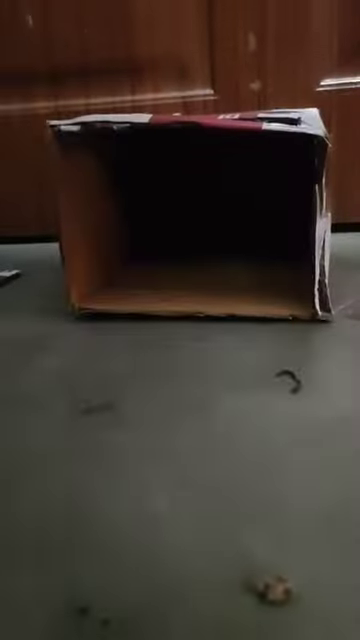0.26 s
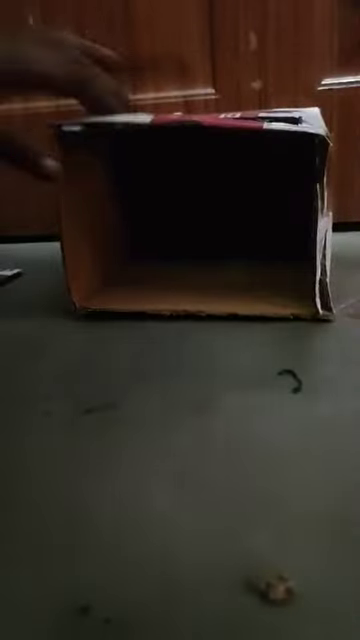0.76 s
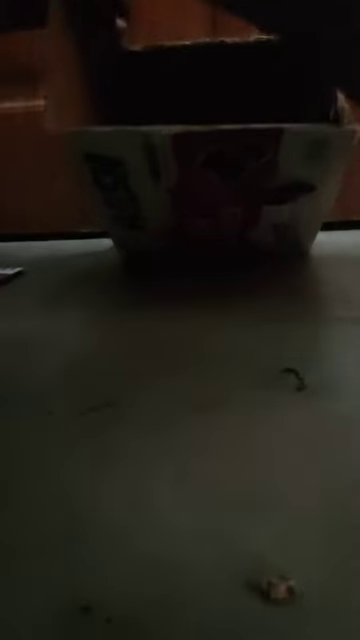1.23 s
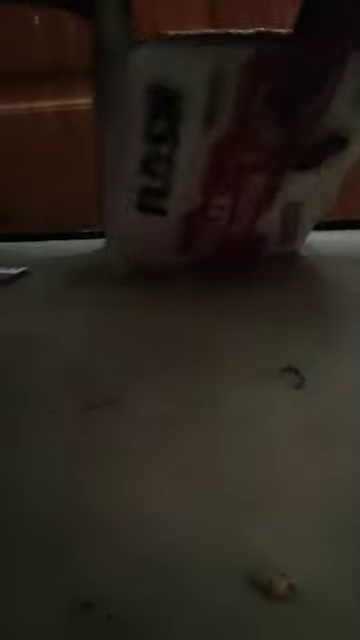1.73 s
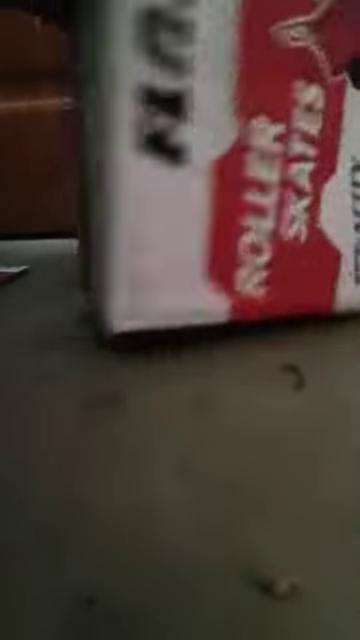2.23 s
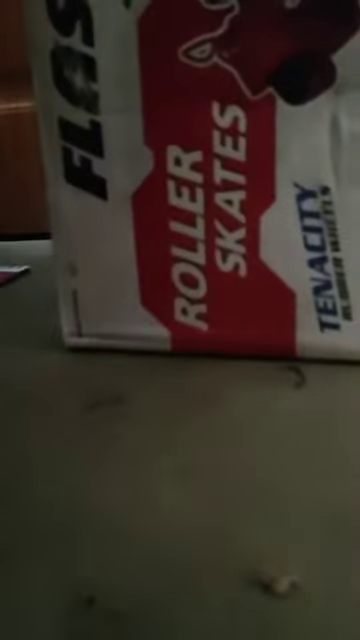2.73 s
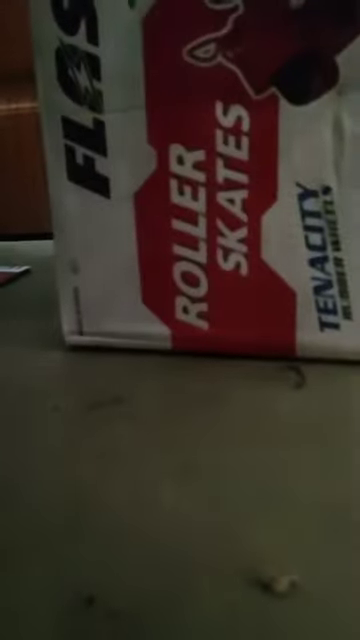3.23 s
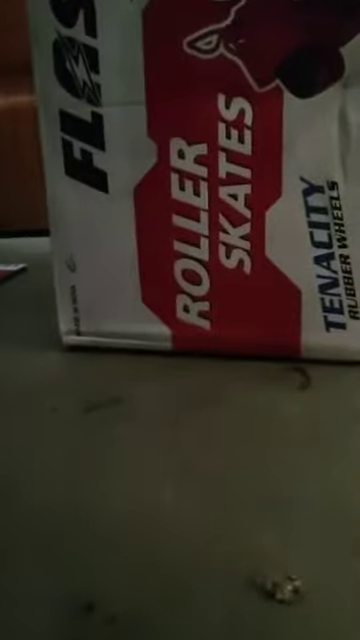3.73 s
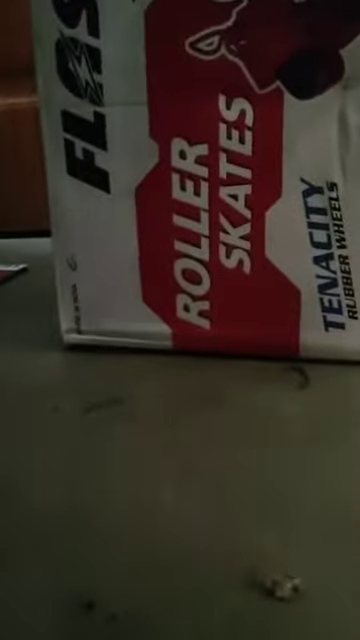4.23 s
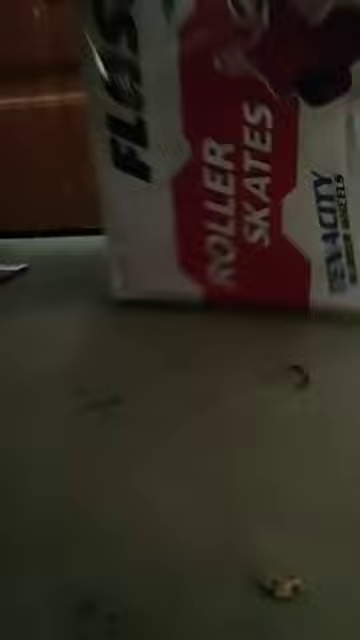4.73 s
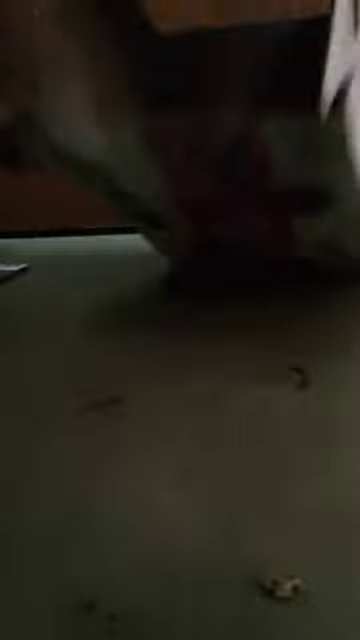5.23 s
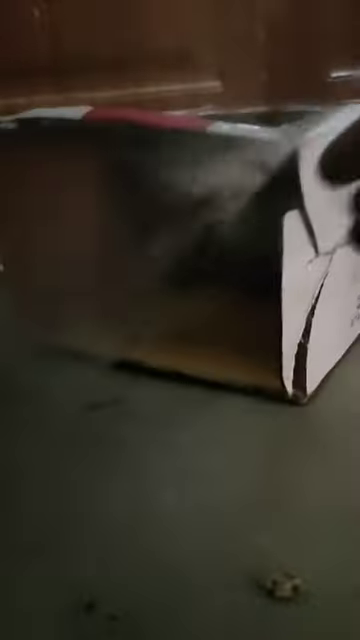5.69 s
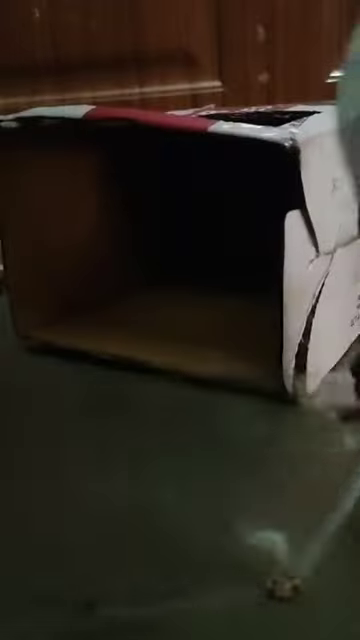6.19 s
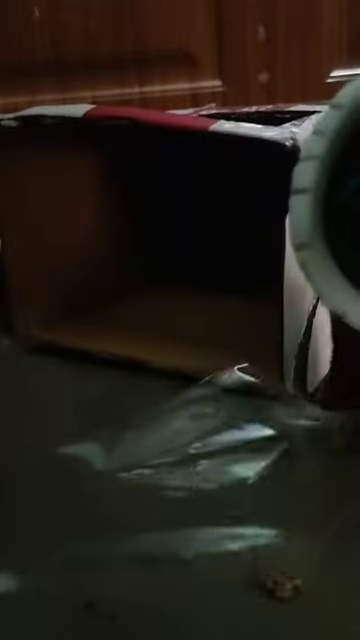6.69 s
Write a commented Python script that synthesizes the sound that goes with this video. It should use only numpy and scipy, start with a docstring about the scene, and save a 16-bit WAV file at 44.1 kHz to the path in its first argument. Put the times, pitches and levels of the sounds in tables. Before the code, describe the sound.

Bangles clink on a wrist as hands turn a hollow cardboard box and a thin plastic sheet crackles and snaps in a small hard room.

```python
"""A thin plastic sheet snaps, crinkles, hisses and squeaks as hands fit it into a cardboard box on a stone floor.
Each snap is a short burst of noise with a ringing facet; crinkles, hiss and squeaks are built from random clicks.
The box booms under the fingers (clicks through narrow resonances) and thuds when struck (fading sine waves).
Bangles clink on the wrist: noisy contacts and high ringing tones.
Around them is a small, hard room with soft air noise and a faint hum, heard from close by."""
import sys
import numpy as np
from scipy import signal
from scipy.fft import rfft, irfft
from scipy.io import wavfile

SR = 44100
rng = np.random.default_rng(int(sys.argv[2]) if len(sys.argv) > 2 else 0)


def unload_wav(signal):
    """Save mono or channel-first audio to the path in sys.argv[1] as 16-bit WAV at rate SR, clipped to [-1, 1]."""
    wavfile.write(
        sys.argv[1],
        SR,
        np.round(np.clip(np.atleast_2d(signal).T, -1, 1) * 32767).astype(np.int16),
    )


N = 306495
T = np.arange(N) / SR  # time of every sample, in seconds


def undb(db):
    """Turn decibels into a plain multiplier."""
    return 10 ** (np.asarray(db) / 20)


def unit(x):
    """Scale a sound to an average (rms) strength of 1."""
    return x / np.sqrt(np.mean(x ** 2))


def fade(t, t60):
    """A sound left to die away, 60 dB weaker after t60 seconds."""
    return np.exp(-np.log(1000) * t / t60)


def freqs(x):
    """Frequency in Hz of each bin of the spectrum of x, kept at 1 or more."""
    return np.maximum(np.fft.rfftfreq(x.shape[-1], 1 / SR), 1)


def colour(x, points):
    """Shape a sound by a spectrum of (pitch_hz, level_db) points, then scale it to strength 1."""
    hz, db = np.transpose(points)
    gain = undb(np.interp(np.log(freqs(x)), np.log(hz), db))
    return unit(irfft(rfft(x) * gain, x.shape[-1]))


def resonate(x, hz, width_hz):
    """One resonance: passes its centre pitch unchanged and weakens the pitches around it."""
    f = freqs(x)
    return irfft(rfft(x) / (1 + 1j * (f / hz - hz / f) * hz / width_hz), len(x))


def add(track, s, sound):
    """Mix a sound into a track, starting at s seconds."""
    i = int(s * SR)
    track[..., i:i + sound.shape[-1]] += sound[..., :N - i]


def grains(rate, spread_db, size=N):
    """Random clicks, about rate per second, most small and a few large."""
    sizes = undb(spread_db * np.minimum(rng.exponential(size=size), 4))
    happens = rng.random(size) < rate / SR
    return happens * sizes * rng.choice([-1, 1], size)


def walk(rate, size=N):
    """Smooth random wander of spread near 1, given a new target rate times a second."""
    k = int(SR / rate)
    targets = rng.standard_normal(size // k + 2)
    return 1.2 * np.interp(np.arange(size) / k, np.arange(size // k + 2), targets)


def pair(size):
    """Spread-out noise at two nearby microphone openings: alike in the bass, unrelated in the treble."""
    mid, side = rng.standard_normal((2, size))
    alike = np.sinc(freqs(mid) / 1400)
    mid = irfft(rfft(mid) * np.sqrt(1 + alike), size)
    side = irfft(rfft(side) * np.sqrt(1 - alike), size)
    return np.array([mid + side, mid - side]) / np.sqrt(2)


# spectrum of the still air in the room: pitch_hz, level_db
AIR_SPECTRUM = [(15, -62), (25, -15), (43, -35), (114, -4), (145, -7.5), (175, 0), (206, -6), (344, -5.5),
                (373, -9.5), (451, -9), (489, -9), (714, -19.5), (911, -21), (1400, -21.5), (16000, -35.5)]
# tones of the hum: pitch_hz, level_db
HUM_TONES = [(57, -73), (172.3, -67), (247.6, -67.5), (446.8, -74.5), (699.8, -84.5)]
AIR_LEVEL_DB, HUM_WIDTH_HZ = -59.5, 4


def room_tone():
    """Soft air noise, and a hum of narrow bands of noise that waver slightly."""
    hum = 0
    for hz, level_db in HUM_TONES:
        tone = resonate(resonate(rng.standard_normal(N), hz, HUM_WIDTH_HZ), hz, 30)
        hum = hum + undb(level_db) * unit(tone)
    return undb(AIR_LEVEL_DB) * colour(pair(N), AIR_SPECTRUM) + hum


# where the hands are: time_s, left_lead_s (how much sooner the left side hears a source with offside 1)
HAND_PATH = [(.6, .00039), (1.2, .0001), (1.75, -.0002), (2.5, .00045), (4.9, .0004), (5.85, .00045),
             (6.3, -.00009), (6.7, .00014)]
SHADE_DB = 0.5  # shift of the balance to the left when the hands are furthest left and offside is 1


def place(x, offside, pan_db, early_db, late_db):
    """One side hears a sound slightly sooner; each has its own balance; floor and door reflect, the room rings."""
    bearing, t = np.interp(T, *np.transpose(HAND_PATH)), T[:SR * 3 // 4]
    # left-right balance: above 0 the left is louder, below 0 the right
    balance_db = pan_db + SHADE_DB * offside * bearing / bearing.max()
    x = x * undb(np.array([[1], [-1]]) * balance_db / 2)
    # the echoes are fading noise: a short dense part, then a longer tail
    early = pair(len(t)) * fade(t, 0.15) * (t > .0015)
    tail = colour(pair(len(t)), [(100, 6.5), (2500, 4.0), (7000, 2), (16000, -6)])  # pitch_hz, level_db
    late = tail * fade(t, 0.57) * (t > .012)
    echo = (undb(early_db) * unit(early) + undb(late_db) * unit(late)) / np.sqrt(len(t))
    lead = np.round(offside * bearing * SR) / SR  # whole samples
    direct = np.array([x[0], np.interp(T - lead, T, x[1])])
    return direct + signal.fftconvolve(x, echo, axes=1)[:, :N]


# bangles striking each other: start_s, level_db, chatter_s (time constant of its dying out), ring_db (free ringing)
BANGLE_CLINKS = [(0.362, -45, .018, -18), (0.375, -32, 0.0094, -21), (0.519, -36.5, 0.011, -16),
                 (0.5472, -22.5, .008, -19), (2.902, -40.5, 0.013, -10), (2.9253, -40.5, 0.0072, -5),
                 (2.967, -41, 0.012, -15), (3.026, -34, .018, -14), (3.0775, -33, .018, -14),
                 (3.1103, -23.5, 0.013, -18), (3.122, -27, 0.0087, -2), (3.22, -45.5, .02, -9),
                 (3.2783, -38.5, 0.026, -36), (3.293, -44, .015, -8), (3.3228, -34.5, 0.0043, -22),
                 (3.355, -46.5, 0.016, -0.5), (3.4275, -26.5, 0.0044, -16), (3.4441, -27.5, 0.03, -9),
                 (3.464, -37, 0.02, -5), (3.4915, -28, .018, -14), (3.516, -35.5, 0.015, -5),
                 (3.5362, -30, 0.0044, -36), (3.592, -38, .004, -20), (3.7002, -35.5, 0.005, -23),
                 (3.7213, -43.5, 0.0074, -8)]
# typical ringing tones of the bangles: pitch_hz, level_db, fade_s (time to fall by 60 dB)
BANGLE_TONES = [(3150, -25, 0.089), (4410, -9.5, 0.11), (4580, -4.5, 0.12), (6280, 7, .12),
                (7950, -23, 0.054), (9070, 15, 0.068), (9500, 7, 0.085), (10100, -5, 0.059),
                (11450, -20, 0.056), (12900, 5, .08), (13000, -14, .1), (14060, -3, .18), (14600, -9, 0.1),
                (15560, -5, 0.063)]
# spectrum of the hard contact: pitch_hz, level_db
CONTACT_SPECTRUM = [(1000, -62), (2300, -13.5), (4800, -2.5), (7500, -3), (10000, 0.5), (12000, -3.5),
                    (15000, 8), (16500, -1)]
CONTACT_T60_S, CHATTER_PER_S, CHATTER_DB = 0.019, 280, -11


def bangles():
    """Each clink is a hard contact and a chatter of more; bangles that swing clear of the wrist ring on."""
    out, t = np.zeros(N), T[:SR // 4]
    hz, db, t60 = np.transpose(BANGLE_TONES)
    decays = np.array([fade(t, d) for d in t60])
    for s, level_db, chatter_s, ring_db in BANGLE_CLINKS:
        # every clink has its own slight tuning and balance of tones
        detune, strength, phase = rng.standard_normal((3, len(hz), 1))
        tuning = hz[:, None] * (1 + .007 * detune)
        weight = undb(db[:, None] + 3 * strength)
        tones = weight * np.sin(2 * np.pi * (tuning * t + phase)) * decays
        ring = tones.sum(0) / np.linalg.norm(weight)
        contact = colour(rng.standard_normal(len(t)), CONTACT_SPECTRUM) * fade(t, CONTACT_T60_S)
        strike = contact + undb(ring_db) * ring
        hits = undb(CHATTER_DB) * grains(CHATTER_PER_S, 2.5, size=len(t)) * np.exp(-t / chatter_s)
        hits[0] = 1  # the first, full contact
        add(out, s, undb(level_db) * signal.fftconvolve(strike, hits)[:len(t)])
    return out


# each shift of the hands on box and sheet:
# start_s, length_s, boom_db (hollow note), rumble_db (walls), crinkle_db (sheet), drumming_db (panel)
GRIP_SHIFTS = [(0.867, 0.16, -55, -64.5, -67, -58), (1.102, 0.31, -42, -54, -54, -48.5),
               (1.48, 0.11, -53, -59.5, -59, -58), (1.634, 0.43, -50, -55.5, -52.5, -56.5),
               (2.188, 0.12, -55, -60, -63, -63), (2.427, 0.34, -47.5, -56.5, -57.5, -61),
               (2.784, 0.47, -46.5, -59, -70, -59), (3.45, 0.35, -54, -69, -66.5, -57.5),
               (3.81, 0.24, -49.5, -61.5, -60, -61), (4.135, 0.023, -59, -62.5, -57.5, -62),
               (4.47, 0.32, -63, -58.5, -55, -53), (4.83, 0.26, -67, -54.5, -51, -55),
               (5.194, 0.3, -61, -54.5, -47.5, -59.5), (5.679, .13, -52, -46, -44.5, -52),
               (5.902, 0.25, -71, -58.5, -60.5, -71), (6.341, .11, -78, -72, -52, -77)]
HOLD_FROM_S = 1  # from here to the end the fingers also keep a faint steady hold
GRIP_SWELL, GRIP_RELEASE_S = 0.31, 0.21  # share of its length over which a shift swells; time to fall by 60 dB


def handling(hold_db, column):
    """Level of one handling sound: each shift of grip swells, holds and dies away, over the steady hold."""
    t = T[::32]  # a coarse time grid is enough
    power = undb(hold_db) ** 2 * (t > HOLD_FROM_S)
    for row in GRIP_SHIFTS:
        s, length_s = row[:2]
        swell = np.clip((t - s) / (GRIP_SWELL * length_s), 0, 1)
        envelope = swell * fade(np.maximum(t - s - length_s, 0), GRIP_RELEASE_S)
        power = power + (undb(row[column]) * envelope) ** 2
    return np.interp(T, t, np.sqrt(power))


# spectrum of the box walls: pitch_hz, level_db
WALL_SPECTRUM = [(24, -64), (40, -21), (197, 1), (243, -29), (291, -4), (334, -7), (466, -9.5), (513, 1),
                 (716, -28), (857, -5.5), (1100, -59), (1430, -57), (2420, -120)]
CAVITY_HZ, CAVITY_WIDTH_HZ, CAVITY_WAVER_HZ = 246, 8, 1.1  # the air inside the box
PANEL_HZ, PANEL_WIDTH_HZ = 207.6, 66
HOLD_BOOM_DB, HOLD_RUMBLE_DB = -62, -76  # steady hold: hollow note; walls and panel


def box_rub():
    """Fingers stick and slip: a panel drums, walls rumble, the air inside hums a note that wavers as the box flexes."""
    note = resonate(resonate(grains(900, 3), CAVITY_HZ, CAVITY_WIDTH_HZ), CAVITY_HZ, 90)
    note = signal.hilbert(note)  # complex form, so its pitch can be shifted
    pitch_waver = np.exp(2j * np.pi * np.cumsum(CAVITY_WAVER_HZ * walk(14)) / SR)
    flex = pitch_waver * undb(1.6 * walk(18))
    # evened out: steady rubbing keeps the note from dying away between slips
    boom = unit((flex * note / np.abs(note) ** .6).real)
    panel = unit(resonate(resonate(grains(400, 3), PANEL_HZ, PANEL_WIDTH_HZ), PANEL_HZ, 90))
    walls = colour(grains(900, 4.6), WALL_SPECTRUM)
    out = boom * handling(HOLD_BOOM_DB, column=2)
    out = out + walls * handling(HOLD_RUMBLE_DB, column=3)
    return out + panel * handling(HOLD_RUMBLE_DB, column=5)


# blows on the box: start_s, level_db, spot_hz (pitch favoured by the spot struck), spread_octaves (around it)
BOX_BLOWS = [(1.07, -28, 216, 0.47), (1.088, -29.5, 195, 0.54), (1.162, -24, 220, 0.51),
             (1.225, -37, 205, 0.59), (1.512, -39, 350, 1.5), (1.85, -32.5, 209, 0.39),
             (1.955, -35.5, 214, 0.51), (2.442, -34, 332, 1.9), (2.475, -35.5, 510, .7),
             (2.508, -27.5, 510, 0.76), (2.636, -45, 332, .6), (2.698, -46, 440, 0.71),
             (2.714, -35.5, 505, 0.36), (3.1, -29.5, 254, 1.03), (3.753, -41, 182, 0.41),
             (4.16, -42.5, 300, 1.6), (4.555, -31, 397, 1.1), (4.574, -40, 500, 0.61),
             (4.682, -33.5, 330, 1.66), (4.733, -31.5, 480, 0.96), (4.756, -38.5, 350, 1.7),
             (5.517, -35, 300, 1.6), (5.653, -10.5, 458, 1.09), (5.675, -20, 220, 1.6),
             (5.697, -18, 280, 0.99), (5.772, -28, 193, 0.78), (5.787, -30, 496, 0.69)]
# typical ringing tones of the box: pitch_hz, level_db, fade_s (time to fall by 60 dB)
BOX_TONES = [(96.8, -2.5, 0.58), (121.7, 2, 0.23), (148.4, -4, 0.13), (181.4, -1.5, 0.16), (209.1, 0, 0.13),
             (231, -3, .12), (264.4, -1, 0.099), (325.2, -1, 0.18), (399, -3.5, 0.11), (449.3, -8, 0.117),
             (476.5, 2, 0.069), (516, 7, 0.067), (819, 0.5, 0.058), (1420, 16, 0.11)]
MODE_SHIFT, FLUTTER_DB = .012, -17  # share by which the grip retunes each tone; level of the loose flaps


def box_knocks():
    """Blows ring the box: slack panels favour low tones, stiff edges high ones; loose flaps flutter dully."""
    out, t = np.zeros(N), T[:SR // 2]
    hz, db, t60 = np.transpose(BOX_TONES)
    for s, level_db, spot_hz, octaves in BOX_BLOWS:
        weight = undb(db) * np.exp(-(np.log2(hz / spot_hz) / octaves) ** 2)
        tuning = hz * (1 + MODE_SHIFT * rng.standard_normal(len(hz)))
        ring = np.zeros(len(t))
        for f, w, d in zip(tuning, weight, t60):
            ring += w * np.sin(2 * np.pi * (f * t + rng.random())) * fade(t, d)
        ring = ring / np.linalg.norm(weight)
        flutter = undb(FLUTTER_DB) * colour(rng.standard_normal(len(t)), WALL_SPECTRUM) * fade(t, 0.22)
        push = (1 - np.exp(-t / .0013)) ** 2  # soft start of the blow
        add(out, s, undb(level_db) * (ring + flutter) * push)
    return out


# spectrum of the crinkling: pitch_hz, level_db
CRINKLE_SPECTRUM = [(400, 14), (800, 12), (1400, 15.5), (2600, 9), (4500, 4), (8000, 0.5), (16000, -3)]
HOLD_CRINKLE_DB = -67.5  # crinkling under the steady hold
FACET_WIDTH_HZ = 550  # a facet is a flat patch of sheet between creases; also used by the snaps


def crinkle():
    """Many tiny creases give way in flurries, each facet with its own brief rattle and pitch."""
    t, facets = T[:SR // 50], 0
    flurry = undb(4 * walk(35))  # crowds and thins the clicks
    for hz in np.geomspace(1200, 6000, 10):
        rattle = rng.standard_normal(len(t)) * fade(t, 0.0071)
        rattle = unit(rattle + 2 * resonate(rattle, hz, FACET_WIDTH_HZ))
        facets = facets + signal.oaconvolve(grains(55 * flurry, 6), rattle)[:N]
    return colour(facets, CRINKLE_SPECTRUM) * handling(HOLD_CRINKLE_DB, column=4)


# the sheet dragged over cardboard: start_s, length_s, rasp_db, hiss_db, pitch_hz (of the rasp)
SHEET_STROKES = [(1.044, 0.056, -51, -53, 1570), (1.134, 0.21, -53, -48, 2530),
                 (1.765, 0.21, -46.5, -47.5, 1500), (1.897, 0.12, -50, -52, 2790),
                 (2.05, 0.1, -52.5, -55.5, 2550), (2.437, 0.082, -41, -48, 1690),
                 (3.003, 0.06, -41.5, -47.5, 3680), (3.085, 0.08, -40, -45, 3520),
                 (4.933, 0.1, -49.5, -43.5, 4180), (5.269, 0.23, -51, -45.5, 2450),
                 (5.644, 0.074, -36, -47, 2350), (5.758, 0.089, -51, -45, 2460),
                 (5.914, 0.083, -45.5, -65, 1620), (6.097, 0.082, -48.5, -56.5, 2400),
                 (6.289, 0.11, -56, -47.5, 4060)]
# spectrum of the coarse slips: pitch_hz, level_db
RASP_SPECTRUM = [(300, 7), (800, 8), (1100, 7), (1500, 6), (2700, 4.5), (4500, 4), (7000, -54),
                 (16000, -27)]
# spectrum of the fine slips: pitch_hz, level_db
HISS_SPECTRUM = [(2000, -38), (4000, -9), (7000, 6), (10000, 1.5), (13000, 1), (16000, 3)]
STROKE_ARCH, JERK_DB, JERKS_PER_S = .7, 2.5, 70  # below 1 the stroke's arch is fuller; size and pace of its jerks


def slide():
    """Film dragged in small jerks: coarse slips rasp in the wall, fine ones merge into a hiss."""
    out, size = np.zeros(N), SR // 2
    for s, length_s, rasp_db, hiss_db, hz in SHEET_STROKES:
        slips = colour(grains(2000, 4.5, size=size), RASP_SPECTRUM)
        rasp = unit(slips + 2.3 * resonate(slips, hz, 700))
        hiss = colour(grains(7000, 5, size=size), HISS_SPECTRUM)
        speed = np.sin(np.pi * np.clip(T[:size] / length_s, 0, 1)) ** STROKE_ARCH
        jerks = undb(JERK_DB * walk(JERKS_PER_S, size=size))
        # the hiss follows the jerks half as strongly in dB
        friction = undb(rasp_db) * rasp * jerks + undb(hiss_db) * hiss * np.sqrt(jerks)
        add(out, s, speed * friction)
    return out


# the sheet catching and squeaking on the cardboard: start_s, length_s, pitch_hz, level_db
SHEET_SQUEAKS = [(1.927, 0.031, 3060, -45), (2.035, 0.018, 1330, -47), (3.658, 0.068, 996, -59)]
SQUEAK_WIDTH = 0.065  # width of the resonance, as a share of its pitch


def squeaks():
    """Where the film grips, its slips fall into step and sing briefly at one rough pitch."""
    out, size = np.zeros(N), SR // 4
    for s, length_s, hz, level_db in SHEET_SQUEAKS:
        width_hz = SQUEAK_WIDTH * hz
        note = resonate(resonate(grains(2900, 0.75, size=size), hz, width_hz), hz, 3 * width_hz)
        arch = np.sin(np.pi * np.clip(T[:size] / length_s, 0, 1))
        add(out, s, undb(level_db) * unit(note) * arch)
    return out


# larger creases snapping over: start_s, level_db, treble_db (-16.5 keeps the spectrum below as it is),
# fade_s (time to fall by 60 dB), facet_hz (pitch of the patch beside the crease)
CREASE_SNAPS = [(1.151, -34, -13, 0.0086, 1440), (1.234, -35, -14, 0.011, 2600),
                (1.3982, -39, -16, 0.015, 2800), (1.5106, -32.5, -16, 0.024, 1190),
                (1.558, -34.5, -15, 0.014, 4670), (1.6173, -42, -19, .0086, 1270),
                (1.649, -40, -22, 0.016, 4400), (1.764, -27.5, -17.5, 0.0094, 2560),
                (1.8121, -30.5, -23, 0.015, 2730), (1.867, -36, -37, .014, 1420),
                (2.076, -30.5, -14.5, 0.017, 4530), (2.353, -48.5, -20, .012, 1370),
                (2.445, -36.5, -18, 0.013, 1480), (2.579, -44, -24, 0.0093, 1500),
                (2.641, -47, -22, .012, 1270), (2.69, -44.5, -39, 0.024, 1420),
                (2.763, -34, -31, 0.0046, 1500), (3.037, -27, -23, 0.017, 3870),
                (3.0777, -32, -21, 0.038, 2730), (3.102, -25.5, -19, 0.013, 2800),
                (3.1105, -20, -24, 0.0064, 4200), (3.123, -40, -28, 0.012, 4900),
                (3.5916, -40.5, -27, 0.01, 3900), (3.6215, -46, -37, 0.012, 2520),
                (3.766, -34.5, -25, 0.0052, 3080), (3.785, -44, -21, .012, 3960),
                (3.928, -36, -27, 0.017, 1370), (4.0336, -41, -20, .0095, 1120),
                (4.135, -49.5, -29, .02, 1590), (4.1775, -38.5, -23.5, 0.0072, 2630),
                (4.336, -41, -19, 0.0099, 4360), (4.3618, -46, -41, 0.0091, 2260),
                (4.3764, -40, -31, 0.0069, 2500), (4.644, -45.5, -8, 0.041, 2220),
                (4.681, -34, -13.5, 0.0098, 2150), (4.7742, -44.5, -47, 0.0097, 2600),
                (4.8393, -38, -26, 0.0061, 1820), (4.863, -43, -42, 0.034, 1510),
                (4.8783, -38.5, -41, 0.02, 2080), (4.927, -22, -18.5, 0.01, 4690),
                (5.0516, -43, -36, 0.01, 2750), (5.075, -39, -38, 0.012, 1390),
                (5.119, -44.5, -23, 0.012, 3190), (5.1589, -32.5, -20, 0.0077, 3800),
                (5.269, -46, -29, .012, 1590), (5.3154, -37.5, -30, 0.0064, 2560),
                (5.341, -39.5, -35, 0.016, 1710), (5.4996, -31, -22, .009, 1590),
                (5.52, -36.5, -24, 0.0069, 2390), (5.625, -40.5, -19, 0.015, 1350),
                (5.6513, -22.5, -21.5, .014, 2540), (5.6717, -25.5, -32, 0.015, 2630),
                (5.7057, -22, -35, 0.0077, 2370), (5.748, -29.5, -45, 0.013, 1540),
                (5.7646, -31, -45, 0.017, 2170), (5.96, -38, -39, 0.0097, 2300),
                (5.9775, -28, -23, 0.0038, 1360), (6.01, -31.5, -53, 0.007, 1490),
                (6.1385, -35.5, -13, 0.019, 1360), (6.29, -35, -8, 0.0077, 1440),
                (6.3852, -23, -2.5, 0.0036, 3760), (6.425, -32.5, -13.5, 0.044, 4700),
                (6.4877, -47, -20, 0.0062, 6460), (6.5594, -31, -14, .013, 1490),
                (6.574, -39.5, -27, 0.031, 1420), (6.766, -38.5, -25, 0.015, 1610),
                (6.783, -47, -33, 0.013, 2480), (6.919, -43, -25, .014, 3480)]
# spectrum of a snap: pitch_hz, level_db
SNAP_SPECTRUM = [(250, 4), (700, -0.5), (1400, 8), (2700, 8), (4500, 7.5), (7000, 5.5), (11000, -2.5),
                 (16000, -2)]
FACET_DB, SNAP_RISE_S = 4, .0016  # how strongly a facet rings; how quickly a snap builds up
LEAD_IN_S, LEAD_IN_DB = .005, -15  # a faint burst of noise leads each snap: by how long, how loud against it


def snaps():
    """A crease buckles in milliseconds and rings the facet beside it; a faint burst of noise leads each snap."""
    out, t = np.zeros(N), T[:SR // 8]
    snap_hz, snap_db = np.transpose(SNAP_SPECTRUM)
    for s, level_db, treble_db, t60, facet_hz in CREASE_SNAPS:
        # the treble setting comes in from 3500 Hz and is complete at 8000 Hz
        tilt_db = (treble_db + 16.5) * np.clip((snap_hz - 3500) / 4500, 0, 1)
        burst = colour(rng.standard_normal(len(t)), np.column_stack([snap_hz, snap_db + tilt_db]))
        burst = unit(burst + undb(FACET_DB) * resonate(burst, facet_hz, FACET_WIDTH_HZ))
        buckle = fade(t, t60) * (1 - np.exp(-t / SNAP_RISE_S)) ** 2
        buckle = buckle / buckle.max()
        add(out, s, undb(level_db) * burst * buckle)
        # the lead-in uses the same noise backwards
        add(out, s - LEAD_IN_S, undb(level_db + LEAD_IN_DB) * burst[::-1] * buckle)
    return out


def scene():
    """Room, wrist, box and sheet, each sound at its own spot."""
    wrist = place(bangles(), offside=0.92, pan_db=-1.0, early_db=-4.0, late_db=-27)
    box = place(box_rub() + box_knocks(), offside=0.38, pan_db=-1.5, early_db=-15, late_db=-12)
    sheet = place(crinkle(), offside=1, pan_db=-3.0, early_db=0.5, late_db=-9.0)
    strokes = place(slide() + squeaks(), offside=0.99, pan_db=-3, early_db=1, late_db=-18)
    creases = place(snaps(), offside=0.94, pan_db=-6, early_db=-4.5, late_db=-14.0)
    return room_tone() + wrist + box + sheet + strokes + creases


START_S, TOP_HZ = 0.1748, 15900  # end of the opening silence; highest pitch let through


def record(dry):
    """The microphone opens after a moment of silence, thins the deepest bass and cuts the top."""
    opened = np.clip((T - START_S) / .005, 0, 1)
    bass_cut = signal.butter(2, 45, "high", fs=SR, output="sos")
    thinned = signal.sosfilt(bass_cut, dry * opened)
    top_cut = signal.ellip(10, .2, 80, TOP_HZ, fs=SR, output="sos")
    return signal.sosfilt(top_cut, thinned)


dry = scene()
out = record(dry)
unload_wav(out)
```